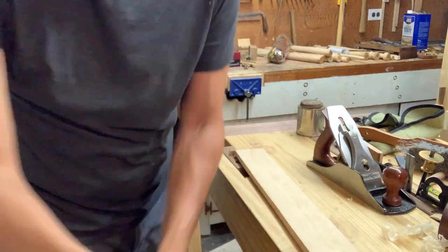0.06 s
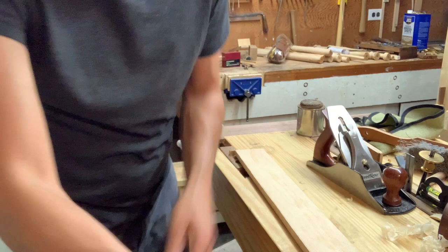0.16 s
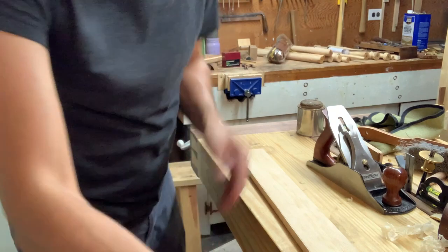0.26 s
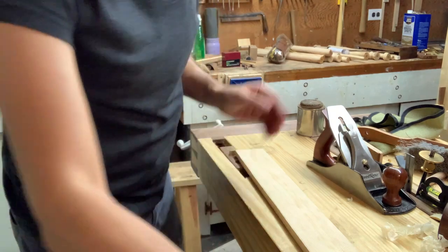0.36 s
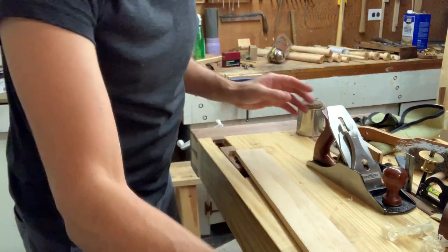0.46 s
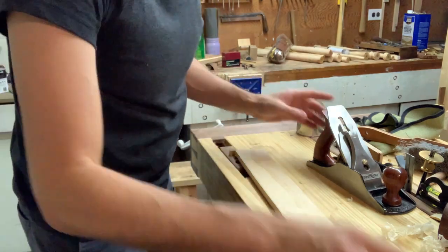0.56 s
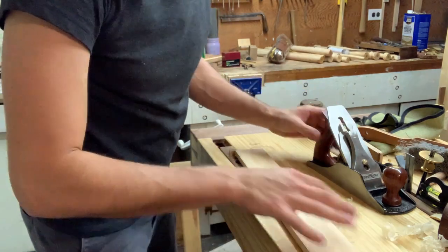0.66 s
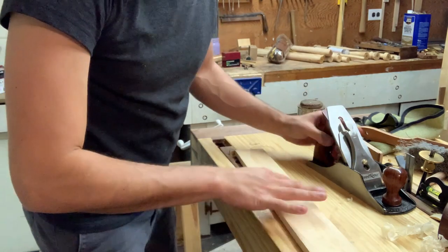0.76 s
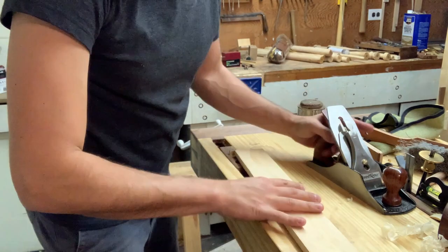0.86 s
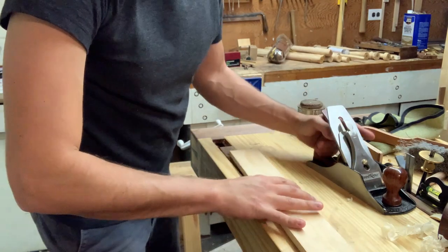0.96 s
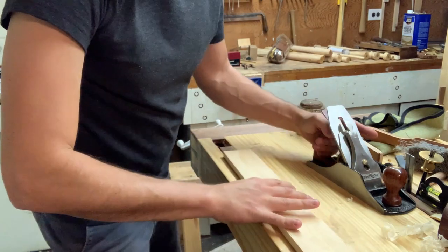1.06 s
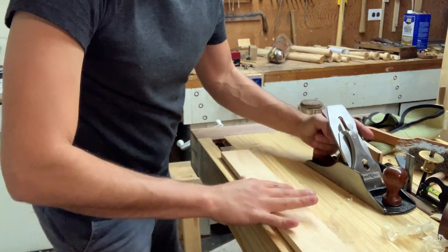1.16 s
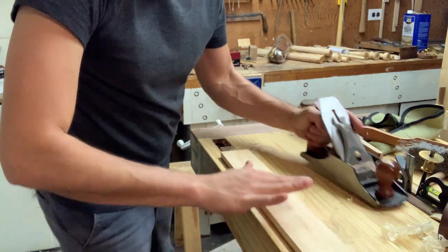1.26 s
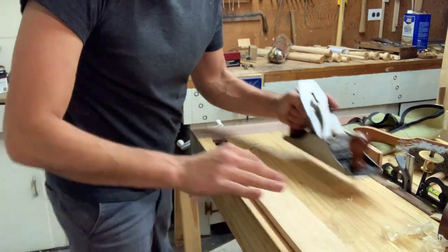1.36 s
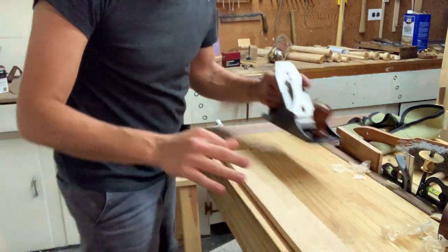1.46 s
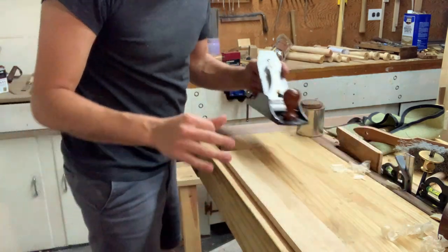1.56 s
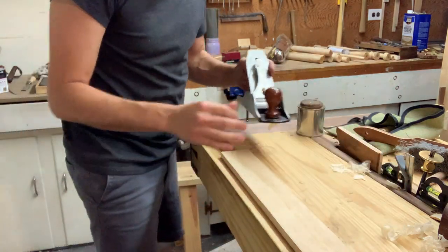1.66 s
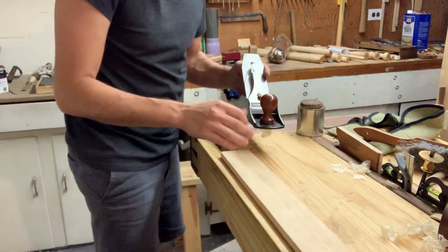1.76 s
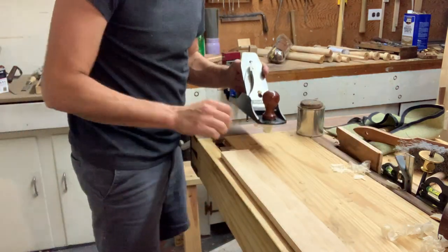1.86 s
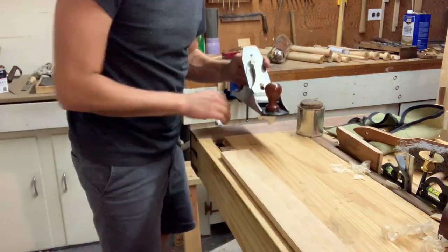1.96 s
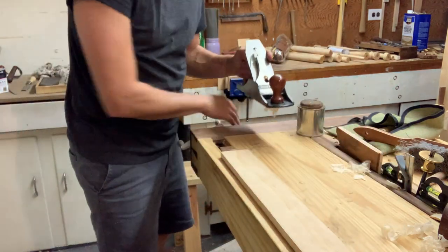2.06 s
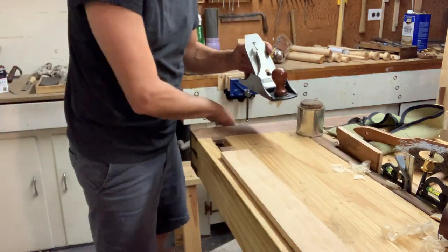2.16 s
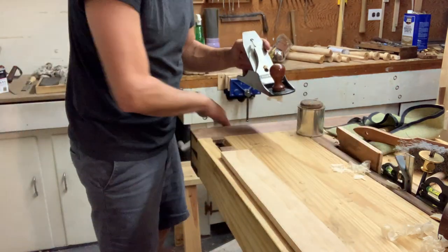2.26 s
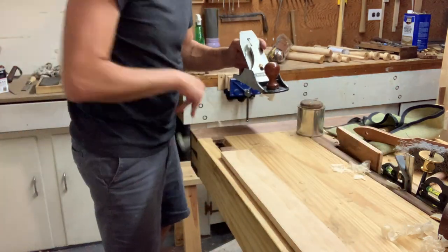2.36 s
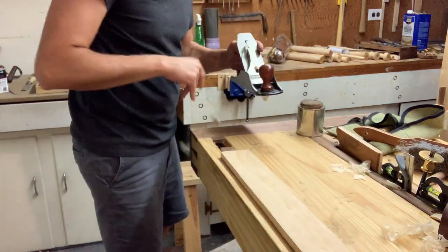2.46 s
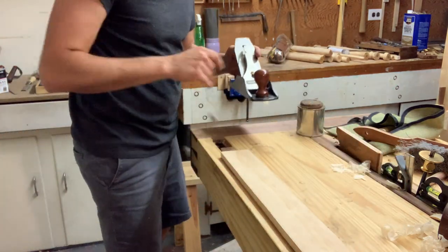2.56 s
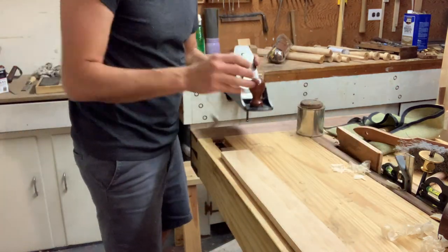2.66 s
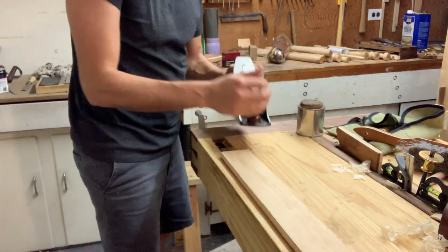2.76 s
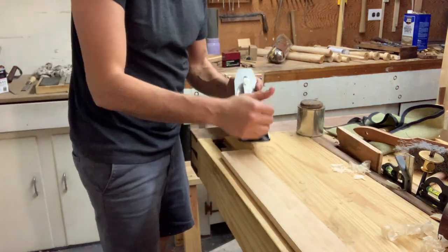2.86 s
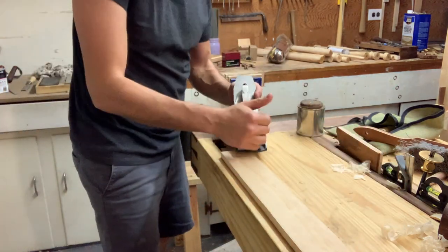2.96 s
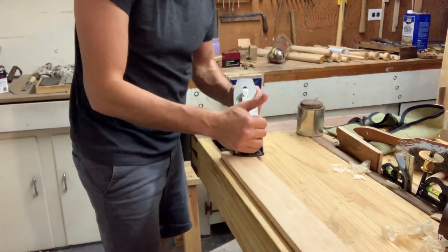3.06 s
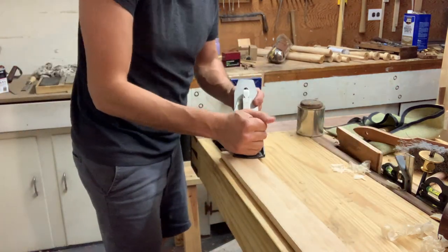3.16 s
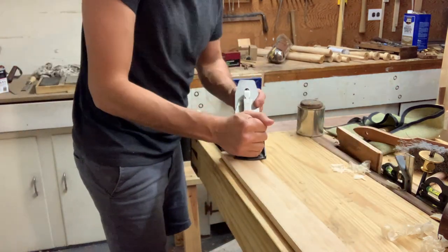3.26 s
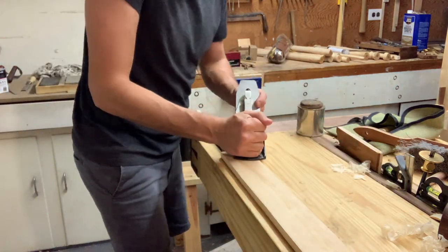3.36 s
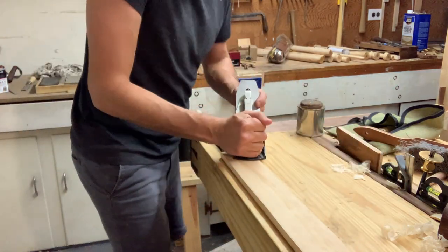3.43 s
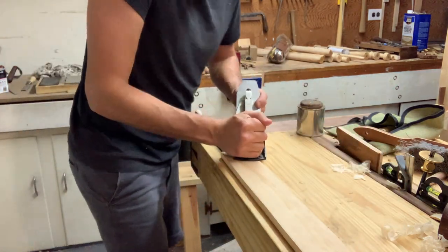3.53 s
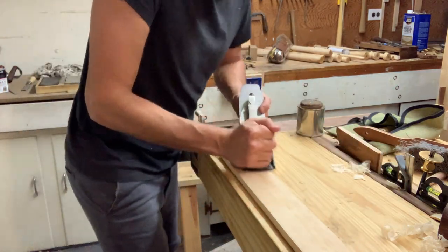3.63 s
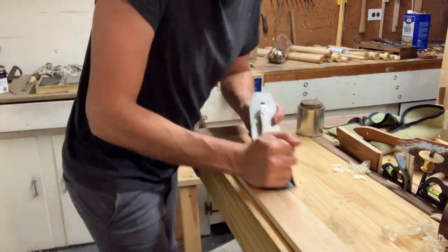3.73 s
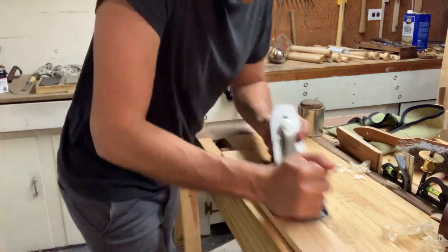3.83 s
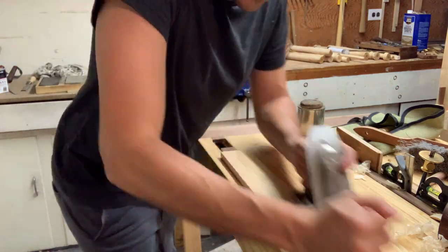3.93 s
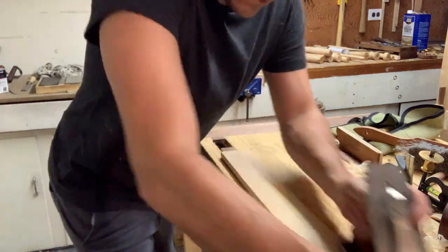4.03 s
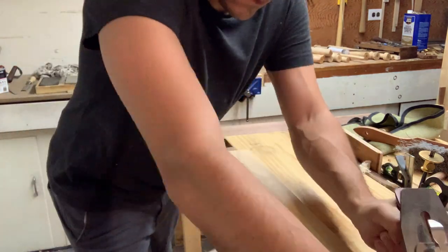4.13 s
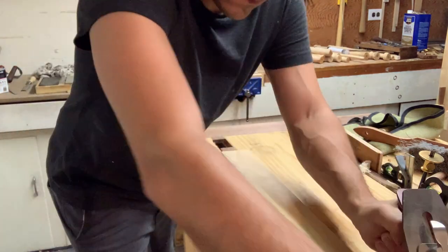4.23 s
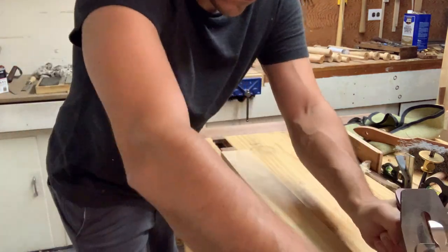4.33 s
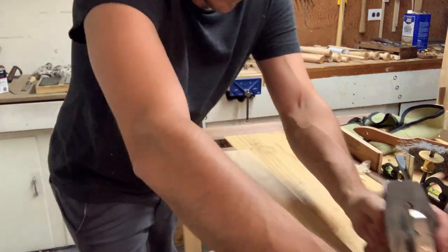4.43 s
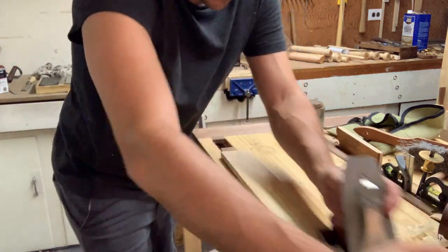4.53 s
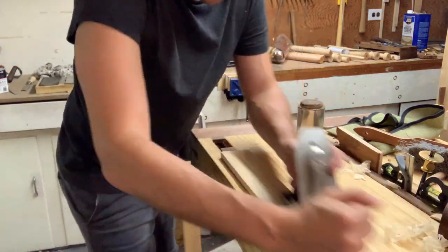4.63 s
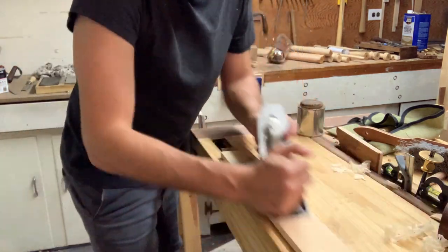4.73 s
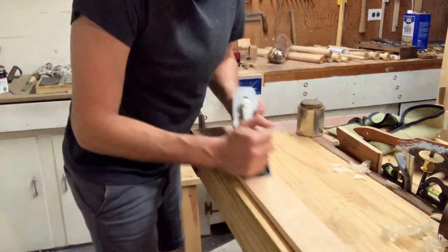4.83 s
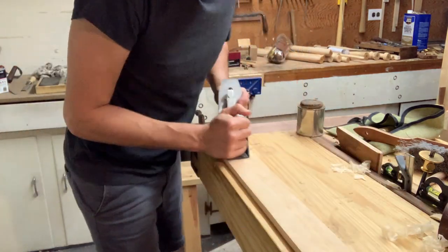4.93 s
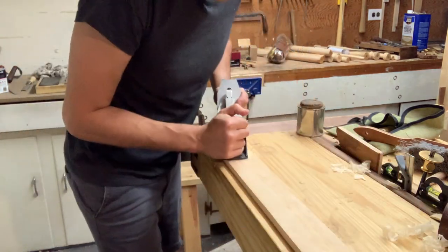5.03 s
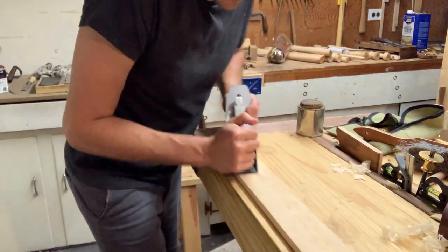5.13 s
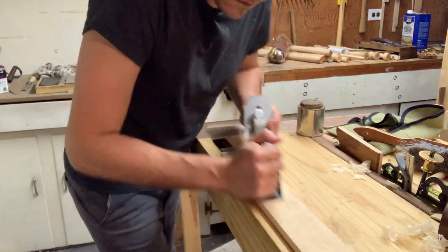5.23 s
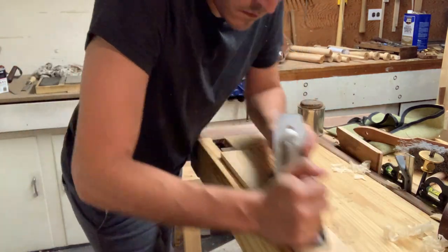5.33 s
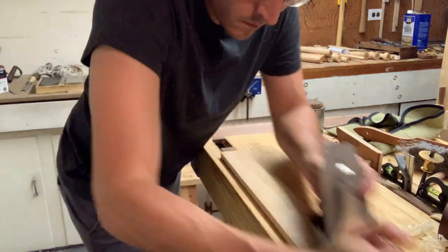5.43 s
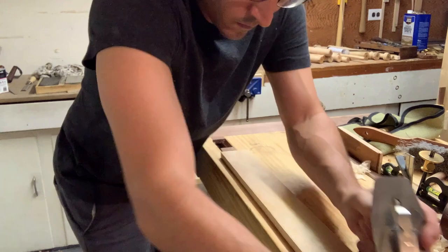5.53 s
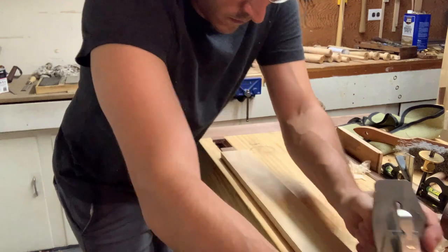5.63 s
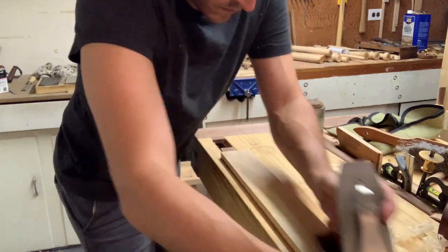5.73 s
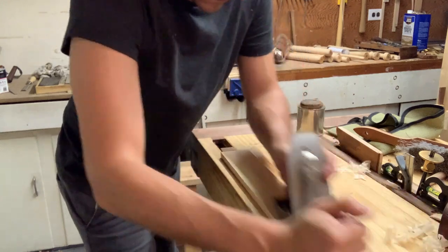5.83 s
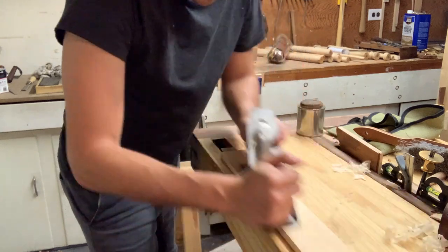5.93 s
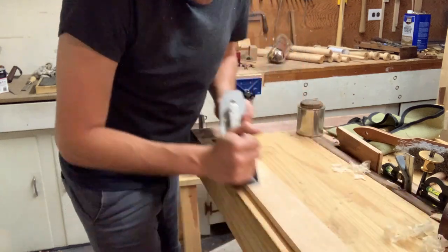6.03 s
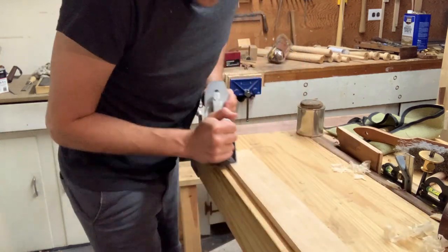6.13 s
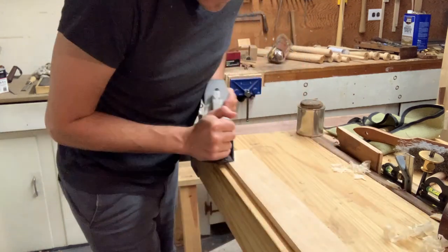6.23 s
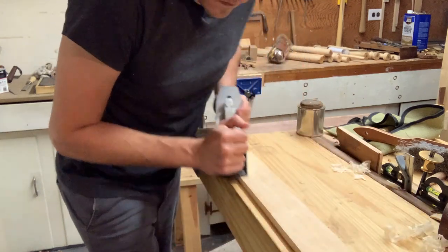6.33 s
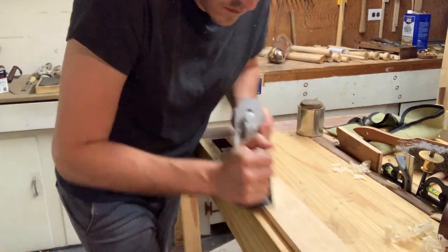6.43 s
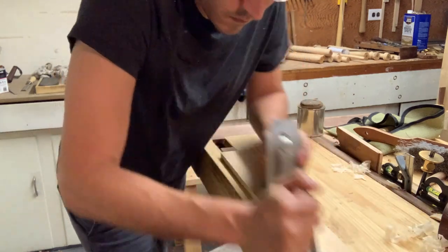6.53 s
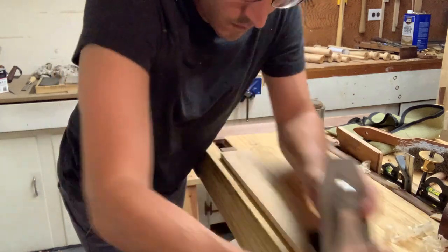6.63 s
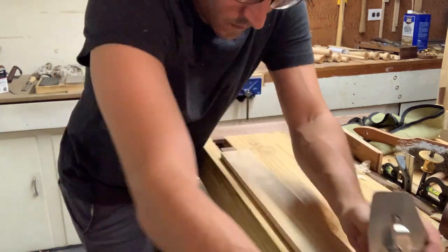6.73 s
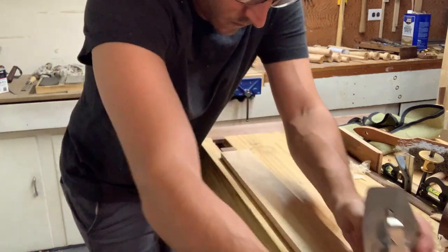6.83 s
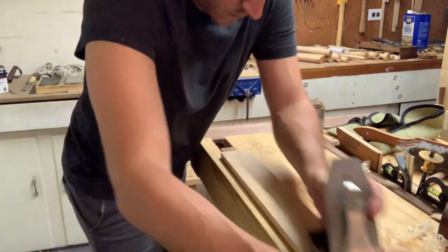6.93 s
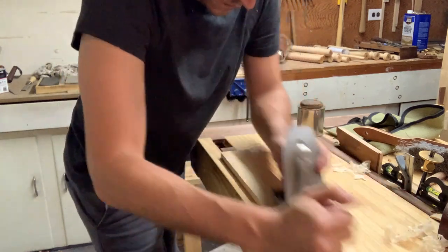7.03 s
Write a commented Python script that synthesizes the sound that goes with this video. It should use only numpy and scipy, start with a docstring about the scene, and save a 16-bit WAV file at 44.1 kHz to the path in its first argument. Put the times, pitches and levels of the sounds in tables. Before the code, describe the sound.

In a small humming workshop, light rubs, clicks and wooden knocks lead to a metal plane clacking down, then six quick raspy strokes on wood.

```python
"""An iron hand plane slides to and fro over a board: grainy noise, shaped by sole and board, rasps with each stroke.
Before and between strokes, light rubs brush the board, wood knocks and the plane is set down, by ringing resonances.
Bright clicks have a short fizz; loose parts chatter faintly. Swells of low tone shake the floor and bench.
Mains hum and air noise fill the small shop, whose echo is fading noise.
A pair of close microphone ports hears it all, with a phase turn between them in the treble."""
import sys
import numpy as np
from scipy import signal
from scipy.fft import rfft, irfft, next_fast_len
from scipy.io import wavfile
from scipy.ndimage import uniform_filter1d, map_coordinates

SR = 44100
rng = np.random.default_rng(int(sys.argv[2]) if len(sys.argv) > 2 else 0)


def log_audio(samples):
    """Write samples as a 16-bit WAV file to the path given in sys.argv[1]."""
    # one column per channel
    frames = np.atleast_2d(samples).T
    # limit to full scale, then quantise
    limited = np.clip(frames, -1, 1)
    pcm = np.round(limited * 32767).astype(np.int16)
    wavfile.write(sys.argv[1], SR, pcm)


def gain_from_db(level_db):
    """Convert decibel levels to linear amplitude factors (20 dB per decade)."""
    decades = np.asarray(level_db, float) / 20
    return 10 ** decades


N = 312669  # length in samples

# Mains hum. Each row: frequency in Hz, usual level in dB rms.
HUM = [(118.4, -58.5), (177.6, -63.5), (242.2, -66.5)]
# Colour of the shop's air noise. Each row: frequency in Hz, relative level in dB per Hz.
AIR_COLOUR = [(15, -23), (25, -5), (87, -8.5), (258, -20), (297, -22), (359, -22.5), (678, -29.5),
              (763, -39), (839, -33), (1510, -39), (1620, -35.5), (1740, -39.5), (7000, -71), (9100, -82),
              (15400, -120)]
# How long the shop echoes. Each row: frequency in Hz, time to fade by 60 dB in seconds.
SHOP_ECHO = [(100, 0.53), (300, 0.57), (1000, 0.4), (3000, 0.33), (8000, 0.33), (14000, 0.14)]
# Low thumps and shoves of floor and bench. Each row: middle in seconds, level in dB rms,
# half length in seconds, pitch in Hz.
THUMPS = [(.1, -51, .05, 62), (0.893, -42, 0.047, 67), (2.12, -46, 0.027, 66), (2.465, -43, 0.063, 90),
          (3.085, -46.5, 0.046, 88), (3.428, -51, 0.041, 70), (3.697, -60, .05, 66),
          (4.333, -49, 0.021, 165), (4.678, -48.5, 0.04, 68), (4.88, -47.5, 0.043, 63),
          (5.414, -59, .04, 66), (5.916, -46, .04, 66), (6.192, -50.5, 0.075, 68),
          (6.36, -41, 0.045, 140.4), (6.384, -39.5, .05, 80)]
# The bench top rings under a shove. Each row: middle in seconds, level in dB rms, half length in seconds.
SHOVES = [(2.4, -40, 0.035), (2.71, -50.5, 0.054), (3.036, -41, 0.021), (3.968, -45, 0.029),
          (4.062, -36.5, 0.019), (4.71, -47, 0.02), (5.435, -48.5, 0.056), (5.94, -47.5, 0.045),
          (6.333, -35.5, 0.021), (6.562, -50, 0.028), (6.638, -45, 0.02), (6.797, -47.5, 0.016),
          (6.943, -45.5, 0.016), (7.029, -38, 0.018)]
# A hand closes on the plane and its loose parts chatter. Each row: time in seconds, level in dB.
GRIP = [(0.85, -85), (0.874, -64), (0.988, -56), (1.03, -81)]
# Loose steel parts of the plane. Each row: resonance in Hz, width in Hz, relative level in dB.
LOOSE_PARTS = [(2060, 130, -5), (3460, 110, 7), (4100, 210, 0), (5300, 150, -19), (6440, 210, -5),
               (7900, 150, 5)]
# Bright clicks: snaps, the crisp edge of a knock, sharp stroke starts. Each row: start in seconds, level in dB,
# mid treble in dB over that level, fizz in dB against its click, time for the fizz to fade by 60 dB in seconds.
BRIGHT_CLICKS = [(.284, -43, -14, 1, .02), (.3052, -30, 5, -11, 0.055), (0.4384, -27.5, 19.5, -27, 0.027),
                 (.489, -45.5, -16, -32, .02), (0.4989, -15, 10, -34, .05), (0.505, -34, 8, -30, 0.027),
                 (4.4045, -23, 9, -44.5, 0.026), (4.623, -45.5, -7, -21, 0.028),
                 (4.628, 3, -2.5, -19.5, 0.18), (5.068, -51, -6, -11, 0.04), (5.724, -46, 9, -13, .05),
                 (6.920, -36, 18, -17, .05)]
# Wooden knocks. Each row: start in seconds, level in dB, relative thud in dB, relative crack in dB,
# favoured resonance in Hz.
KNOCKS = [(.44, -32.5, -31, -12, 1340), (.503, -47, -24, -9, 800), (2.064, -38, -14.5, -12, 710),
          (2.262, -19.5, -17, -12, 835), (2.279, -22, -16, -30, 620), (2.292, -23, -9, -28, 515),
          (2.326, -21, -16, -16, 770), (2.357, -20.5, -7, 1, 950), (2.366, -16.5, -9.5, -5.5, 950),
          (2.38, -16.5, -8.5, -4, 660), (2.4, -23, -24, -5, 950), (2.418, -29, -25, -21, 890),
          (2.441, -17.5, -34, -17, 660), (2.578, -20, -17, -46, 550), (2.608, -31.5, -4, -32, 515),
          (2.645, -30.5, -37.5, -34, 1750), (2.652, -20, -22, -45, 660), (4.041, -40, 5.5, -18, 520),
          (4.296, -34.5, -10.5, -30, 950), (6.312, -24, -8.5, -33, 515), (6.32, -28, -9, -24, 506),
          (6.339, -42, 9.5, -28, 520), (7.024, -49.5, 10, -20, 520)]
# Bench and board. Each row: resonance in Hz, width in Hz, relative level in dB.
WOOD_MODES = [(87, 22, -6.5), (164, 59, 9), (345, 28, 4.5), (407, 46, -7.5), (515, 108, -1.5),
              (660, 45, 0.5), (950, 83, 0), (1340, 93, -4.5), (1750, 164, -8.5), (2430, 1040, -19),
              (3600, 1000, -22.5)]
# The plane lands on the board. Each row: start in seconds, level in dB, relative thud in dB,
# relative crack in dB, favoured resonance in Hz.
LANDINGS = [(3.0157, -5.5, -23, -38, 1750), (3.0186, -1, -34, -2.5, 2070), (3.0212, -17, -20, 7, 1980),
            (3.025, -10.5, -13, -27, 910), (4.278, -29, -25, -29, 2010), (4.284, -41, -9, -35, 940),
            (6.3, -23, -18, -40, 1120), (6.306, -21.5, -8, -40, 1700)]
# Plane body on the board. Each row: resonance in Hz, width in Hz, relative level in dB.
IRON_MODES = [(91, 33, -32), (180, 27, 8.5), (320, 58, -1.5), (654, 420, 2), (780, 120, 9),
              (1040, 370, -2.5), (1440, 320, -15), (1610, 740, -6), (2110, 160, -2), (2650, 380, -4.5),
              (3550, 300, -11)]
# Light rubs and scrapes, some leading into a plane stroke. Each row: full contact in seconds,
# length in seconds, rasp level in dB, rise time in seconds, fine hiss in dB over the rasp.
BRUSHES = [(0.246, 0.041, -69, 0.18, -13), (0.304, 0.024, -56.5, 0.0062, 4.5),
           (0.436, 0.005, -48, 0.0074, -34), (0.492, 0.01, -57.5, .01, -17), (0.593, .26, -72, .1, -17),
           (0.869, 0.14, -59, 0.018, -17.5), (1.054, .4, -70.5, .1, -14), (1.155, 0.045, -65, 0.11, 3),
           (1.28, 0.018, -64.5, .05, -8), (1.523, 0.05, -59.5, 0.081, -4), (1.671, 0.03, -47.5, 0.17, -3.5),
           (1.794, 0.16, -61.5, 0.14, -24), (2.071, 0.013, -58, .2, -23), (2.269, 0.023, -59, 0.069, -6),
           (2.497, 0.16, -63.5, .1, -28.5), (3.448, 0.037, -59, 0.062, -12.5),
           (4.372, 0.024, -62.5, .06, -2), (4.454, 0.15, -56.5, 0.18, -1.5), (5.613, 0.17, -62.5, .1, -3.5),
           (6.27, 0.014, -50, 0.077, -14), (6.8, 0.13, -61, 0.062, -1.5)]
# Plane strokes, push and pull in turn. Each row: full contact in seconds, length in seconds,
# rasp level in dB, rise time in seconds, singing resonance in Hz.
STROKES = [(3.62, 0.43, -46, 0.19, 3240), (4.525, 0.39, -49.5, 0.1, 3100), (5.09, 0.39, -48.5, 0.081, 3400),
           (5.728, 0.38, -45, 0.027, 4100), (6.37, 0.28, -45, 0.23, 3260), (6.923, .3, -48, 0.028, 3600)]
# The edge bites harder for a while. Each row: middle in seconds, extra level in dB, half length in seconds.
BITES = [(3.92, 3, 0.25), (3.996, 3.5, .012), (4.547, 3.5, 0.02), (4.696, 4, 0.032), (4.828, 7.5, 0.021),
         (5.105, 4.5, 0.031), (5.192, 6.5, 0.031), (5.318, 8.5, 0.051), (5.504, 9, 0.058), (5.798, 5, .05),
         (5.923, 3.5, 0.032), (6.054, 5, 0.025), (6.656, 2, 0.037), (7.09, 9.5, .03)]
# Basic colour of the rasp. Each row: frequency in Hz, relative level in dB per Hz.
RASP_COLOUR = [(300, -10.5), (600, -8), (1200, -4.5), (2200, -1.5), (3500, -4.5), (5500, -1), (7500, 0),
               (9500, 2), (11500, -0.5), (13000, -5.5), (14300, -6), (15000, -11.5), (15700, -18)]
# Sole and board under friction. Each row: resonance in Hz, width in Hz, relative level in dB.
FRICTION_MODES = [(800, 70, 15), (2420, 13, -3), (3010, 36, 3), (3180, 21, -31.5), (3670, 87, 6),
                  (4630, 150, 4.5), (4700, 15, -18), (5330, 27, -3), (6370, 53, 0)]
# Likeness of the two ports. Each row: frequency in Hz, likeness from 0 (unrelated) to 1 (the same).
ALIKE = [(60, 0.82), (170, 0.59), (350, 0.3), (550, 0.067), (1000, 0.18), (1700, 0.31), (3400, 0.42),
         (4800, 0.086), (6200, 0.047), (7000, 0.063), (7500, 0.88), (9200, 0.93), (9700, 0.68),
         (11000, 0.63), (11700, 0.93), (13300, 0.89), (14400, .4), (15100, 0.4)]
# Phase between the ports. Each row: frequency in Hz, half turns by which the right port leads.
RIGHT_LEAD = [(350, 0), (550, .35), (850, .55), (1100, .35), (1400, .15), (1700, .1), (4000, .3),
              (6200, .45), (7000, .75), (7500, 1), (9200, 1), (9700, 1.25), (10400, 1.5), (11000, 1.75),
              (11700, 2), (13300, 2), (14400, 2.6), (15100, 3)]
# Balance of the ports. Each row: frequency in Hz, left over right in dB.
LEFT_OVER_RIGHT = [(60, -3), (200, -5.5), (500, -0.5), (1200, -0.5), (2200, 1), (3500, 0), (5500, -2),
                   (7000, 1.5)]

AIR_DB = -50.5  # rms
FLOOR_HZ, FLOOR_DB = 66, -57  # resonance and usual rumble level (rms)
TOP_HZ, TOP_DB = 210.5, -71  # the same for the bench top
PUSH, PULL = (-0.91, 1.4), (-4, -1.5)  # (fine hiss dB, board body dB) over the rasp
BRUSH_HZ, BRUSH_BODY_DB = 2720, 5  # singing resonance, board body over the rasp
RISE_DB = 30  # climb during the rise time
STROKE_FALL_DB_PER_S, BRUSH_FALL_DB_PER_S = 157, 206
HISS_LINGERS, BODY_LINGERS = 0.1, 0.44  # dB gained on the rasp per dB of its fall
HISS_DB = -78.5  # microphone noise, rms before the ports shape it


def unit(x):
    """Scales a sound to rms 1."""
    return x / np.sqrt(np.mean(x ** 2) + 1e-20)


def along(points, hz):
    """Reads a (Hz, value) table on a log frequency axis."""
    f, v = np.transpose(points)
    return np.interp(np.log(hz + 1), np.log(f + 1), v)


def wobble(rate):
    """A smooth random curve with rate new values a second."""
    return map_coordinates(rng.standard_normal(int(N * rate / SR) + 4), [np.arange(N) * rate / SR])


def filtered(x, response):
    """Shapes x by a complex response of frequency."""
    m = next_fast_len(N + SR // 2)
    return irfft(rfft(x, m) * response(np.fft.rfftfreq(m, 1 / SR)), m)[..., :N]


def modes(table, hz):
    """Response of a set of resonances that ring only after a push, with alternating signs."""
    total = 0
    for k, (centre, width, db) in enumerate(table):
        damping = 1j * hz * width
        total = total + (-1) ** k * gain_from_db(db) * damping / (centre ** 2 - hz ** 2 + damping)
    return total


def band(hz, lo_hz, hi_hz):
    """Response that keeps the range between two frequencies."""
    return (1j * hz / (lo_hz + 1j * hz) * hi_hz / (hi_hz + 1j * hz)) ** 2


def background():
    """Mains hum as slightly unsteady sine tones, over distant air noise."""
    t = np.arange(N) / SR
    hum = 0
    for hz, db in HUM:
        level = np.sqrt(2) * gain_from_db(db + 2.3 * wobble(3.53))
        hum = hum + level * np.sin(2 * np.pi * hz * t + 0.76 * wobble(7.3))
    air = filtered(rng.standard_normal((2, N)), lambda hz: gain_from_db(along(AIR_COLOUR[:-1], hz)))
    return hum + gain_from_db(AIR_DB) * unit(air)


def room(x):
    """The shop's echo: each quarter second of sound gets a fresh tail of noise, each pitch fading at its own rate."""
    out, step = np.zeros((2, N + 2 * SR)), SR // 4
    for start in range(0, N, step):
        hz, t, z = signal.stft(rng.standard_normal((2, SR // 2)), SR, nperseg=256)
        fade = gain_from_db(-60 * t / along(SHOP_ECHO, hz)[:, None])
        tail = signal.istft(z * fade, SR, nperseg=256)[1]
        wet = signal.fftconvolve(x[None, start:start + step], tail / np.linalg.norm(tail[0]), axes=1)
        out[:, start + 200:][:, :wet.shape[1]] += wet  # the echo starts 200 samples late
    return out[:, :N]


def shake():
    """Floor and bench top rumble faintly all along; each thump and shove adds a short swell of low tone."""
    t = np.arange(N) / SR
    out, waver = np.zeros(N), 0.81 * wobble(8)
    for hz, width, db in [(FLOOR_HZ, 18.6, FLOOR_DB), (TOP_HZ, 38, TOP_DB)]:
        rumble = filtered(rng.standard_normal(N), lambda f: modes([(hz, width, 0)], f) ** 2)
        out += gain_from_db(db + 3.9 * wobble(4.8)) * unit(rumble)
    for s, db, half, hz in THUMPS + [(*shove, TOP_HZ) for shove in SHOVES]:
        swell = np.sqrt(2) * gain_from_db(db) * np.exp(-((t - s) / half) ** 2)
        out += swell * np.sin(2 * np.pi * hz * t + waver)
    return out


def grip():
    """Faint chatter: noise rings the plane's small steel parts."""
    t = np.arange(N) / SR
    chatter = unit(filtered(rng.standard_normal(N), lambda hz: modes(LOOSE_PARTS, hz)))
    held = (t > GRIP[0][0]) & (t < GRIP[-1][0])
    return gain_from_db(np.interp(t, *np.transpose(GRIP))) * chatter * held


def bright_clicks():
    """Snaps, crisp knock edges and sharp stroke starts: each is one sharp click and a short fizz of noise."""
    trains, t = np.zeros((2, N + SR)), np.arange(SR // 4) / SR
    for s, db, mid_db, fizz_db, t60 in BRIGHT_CLICKS:
        burst = gain_from_db(fizz_db - 60 * t / t60) * rng.standard_normal(len(t))
        burst[0] += 1.8  # the click
        band_db = np.array([[8], [mid_db - 8.5]])  # ringing treble, mid treble
        trains[:, round(s * SR):][:, :len(t)] += gain_from_db(db + band_db) * burst
    shell = [(9100, 1500, -2.0), (13500, 1300, -5)]  # the click's own bright ring: (Hz, width Hz, dB)

    def tone(hz):
        return np.array([modes(shell, hz) * band(hz, 7000, 12700), band(hz, 5200, 10500)])

    return filtered(trains[:, :N], tone).sum(0)


def blows(events, table, thud_db, ring_db, crack_db, rough, soft_hz, contact_s, stiffens, dulls):
    """Each contact is a short push that rings the resonances, most near a favoured one, and adds a noisy crack."""
    out, size = np.zeros(N + SR), 1 << 13
    t, hz = np.arange(size) / SR, np.fft.rfftfreq(size, 1 / SR)
    centre, width, level = np.transpose(table)
    for s, db, low_db, high_db, spot_hz in events:
        span = contact_s * gain_from_db(-stiffens * db)  # a harder blow makes a shorter contact
        shape = np.exp(-t / span) * (1 - np.exp(-t / min(span / 3, 4e-4)))
        push = shape * rng.standard_normal(size) if rough else shape  # a dragging contact or a clean one
        force = rfft(push / np.linalg.norm(push))
        favour = 9 * np.exp(-(np.log2(centre / spot_hz) / 0.29) ** 2)
        scatter = rng.normal(0, 2.5, len(level))  # new strengths for every blow
        struck = level + scatter + np.where(centre < 450, low_db + thud_db, ring_db + favour)
        if rough:  # a dragging contact feeds every resonance about evenly
            fed = np.interp(centre, hz, uniform_filter1d(np.abs(force), size=9))
            struck = struck - np.clip(20 * np.log10(fed), -8, 8)
        ring = force * modes(zip(centre, width, struck), hz)
        crack = np.exp(-t / (span + 0.006)) * rng.standard_normal(size)
        crack = rfft(crack / np.linalg.norm(crack)) * band(hz, 1700, 9800)
        ring += gain_from_db(high_db + crack_db) * crack
        # softness dulls the top, most in weak blows
        softness = (1 + 1j * hz / (soft_hz * gain_from_db(dulls * db))) ** 3
        out[round(s * SR):][:size] += gain_from_db(db) * irfft(ring / softness, size)
    return out[:N]


def knocks():
    """Wood knocks: rough, dragging pushes ring bench and board."""
    return blows(KNOCKS, WOOD_MODES, thud_db=34.0, ring_db=23.5, crack_db=25, rough=True,
                 soft_hz=5700, contact_s=0.0043, stiffens=.05, dulls=0.09)


def landings():
    """The plane lands on the board: clean, short pushes ring its iron body."""
    return blows(LANDINGS, IRON_MODES, thud_db=28, ring_db=10.5, crack_db=10.5, rough=False,
                 soft_hz=7160, contact_s=.00003, stiffens=0.5, dulls=0.18)


def contact(t):
    """Rise, hold and fall of every rub; the loudest sets most of the colour, and hiss and body outlast the rasp."""
    rows = []
    for k, (s, length, db, rise, hz) in enumerate(STROKES):
        rows.append((s, length, db, rise, hz, *(PUSH, PULL)[k % 2], STROKE_FALL_DB_PER_S))
    for s, length, db, rise, hiss_db in BRUSHES:
        rows.append((s, length, db, rise, BRUSH_HZ, hiss_db, BRUSH_BODY_DB, BRUSH_FALL_DB_PER_S))
    s, length, db, rise, hz, hiss_db, body_db, fall = np.transpose(rows)[:, :, None]
    missing_db = RISE_DB * np.clip(s - t, 0, None) / rise
    fallen_db = fall * np.clip(t - s - length, 0, None)
    power = gain_from_db(2 * np.maximum(db - missing_db - fallen_db, -140))
    share = power / power.sum(0)
    lag_db = np.minimum(fallen_db, RISE_DB)
    colour = [hiss_db + HISS_LINGERS * lag_db, body_db + BODY_LINGERS * lag_db, hz]
    return [10 * np.log10(power.sum(0))] + [(share * c).sum(0) for c in colour]


def rub():
    """Wood fibres tear and slip: grainy noise through sole and board, its colour moving with each rub."""
    grit = gain_from_db(1.3 * rng.exponential(size=N)) * rng.standard_normal((2, N))
    hz, t, z = signal.stft(unit(grit), SR, nperseg=512)
    _, hiss_db, body_db, peak_hz = contact(t)
    octave = np.log2(hz[:, None] + 1)
    high = np.clip((octave - np.log2(5000)) / 0.69, 0, 1.2)  # finer fibres reach higher
    low = np.clip((np.log2(2400) - octave) / 0.55, 0, 1)
    song = 6.5 * np.exp(-((octave - np.log2(peak_hz)) / 0.38) ** 2)
    # random flicker of the colour: broad patches, then narrow, longer-lasting streaks
    patches = uniform_filter1d(uniform_filter1d(rng.standard_normal(z.shape[1:]), 6, 0), 6, 1)
    streaks = uniform_filter1d(uniform_filter1d(rng.standard_normal(z.shape[1:]), 2, 0), 12, 1)
    flicker = 2.2 * unit(patches) + 2.1 * unit(streaks)
    resonance = 1 + 0.3 * np.abs(modes(FRICTION_MODES, hz))[:, None]
    colour_db = along(RASP_COLOUR, hz)[:, None] + high * hiss_db + low * body_db + song + flicker
    gain = resonance * gain_from_db(colour_db)
    counted = (hz > 2000) & (hz < 6500)  # the rasp level counts in this range
    gain /= np.sqrt(np.mean(gain[counted] ** 2, axis=0) * 4500 / (SR / 2))
    pair = signal.istft(z * gain, SR, nperseg=512)[1][:, :N]
    ridges = .8 * wobble(45) + 1.1 * wobble(22)  # the grain passes in ridges
    now = np.arange(N) / SR
    bites = sum(db * np.exp(-((now - s) / half) ** 2) for s, db, half in BITES)
    level_db = np.interp(now, now[::44], contact(now[::44])[0])
    return pair * gain_from_db(level_db + ridges + bites)


def scene():
    """Hits excite the shop strongly, the near rasp only a little."""
    knocking, landing = knocks(), landings()
    clicks, rasp = bright_clicks() + grip(), rub()
    wet = room(gain_from_db(0.5) * knocking + gain_from_db(-3.5) * landing + gain_from_db(-7) * clicks + gain_from_db(-10) * rasp[0])
    return knocking + landing + clicks + rasp + wet + shake() + background()


def low_pass(x):
    """Removes everything above the highest recorded frequency."""
    return signal.sosfilt(signal.butter(12, 15600, fs=SR, output="sos"), x)


def record(dry):
    """The ports share part of the sound, turn its phase against each other and differ in level with pitch."""
    dry = dry + gain_from_db(HISS_DB) * rng.standard_normal(dry.shape)

    def share(hz):  # a smaller angle makes the ports more alike
        angle = np.arccos(np.clip(along(ALIKE, hz), -1, 1)) / 2
        return np.array([np.cos(angle), np.sin(angle)])

    def skew(hz):  # half of the level and phase difference goes to each port
        left = gain_from_db(along(LEFT_OVER_RIGHT, hz) / 2) * np.exp(-.5j * np.pi * along(RIGHT_LEAD, hz))
        return np.array([left, 1 / left])

    pair = np.array([dry[0] + dry[1], dry[0] - dry[1]]) / np.sqrt(2)
    mid, side = filtered(pair, share)
    ports = filtered(np.array([mid + side, mid - side]), skew)
    ports = filtered(ports, lambda hz: (1j * hz / (24 + 1j * hz)) ** 4)  # bass cut
    return low_pass(ports)


dry = scene()
out = record(dry)
log_audio(out)
```